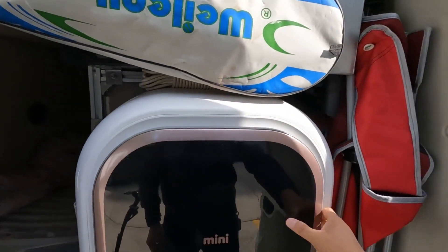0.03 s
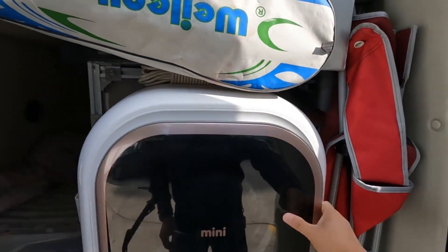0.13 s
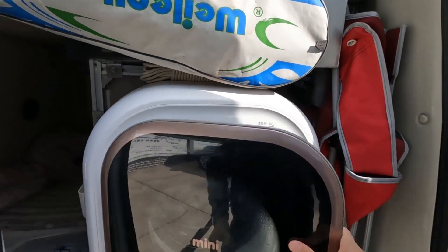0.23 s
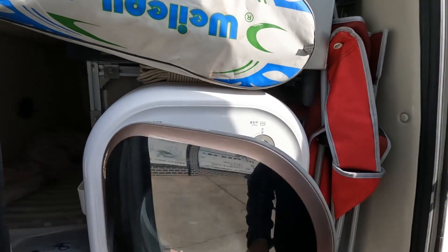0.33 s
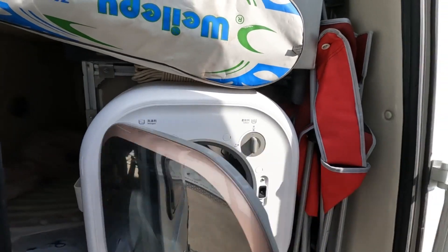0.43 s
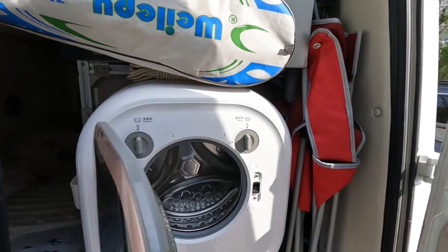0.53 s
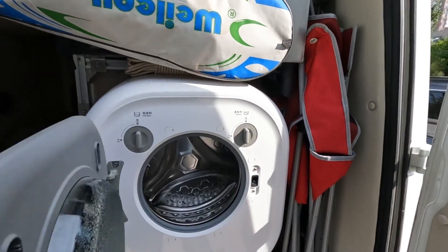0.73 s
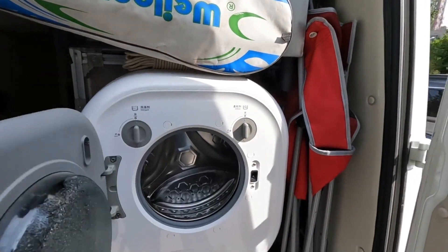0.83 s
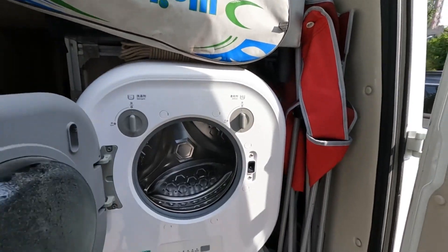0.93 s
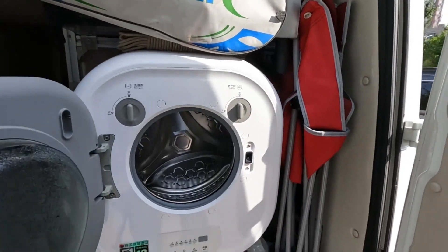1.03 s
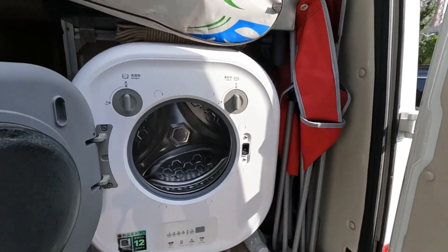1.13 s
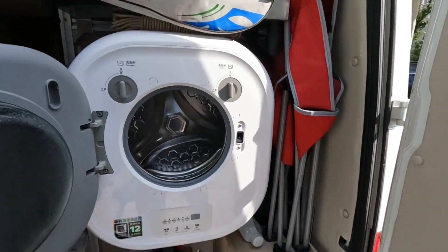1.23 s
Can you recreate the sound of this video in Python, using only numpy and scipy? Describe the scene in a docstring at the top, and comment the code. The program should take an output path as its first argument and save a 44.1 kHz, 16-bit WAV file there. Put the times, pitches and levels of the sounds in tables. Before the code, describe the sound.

A small washing machine door is pulled open, heard close in a cramped space with short dull reflections. After faint ticks, the latch snaps free in clustered clacks from 0.2 to 0.35 seconds, with hollow panel thuds and a brief rising low drum note. A faint rub comes near 0.73, a hinge creak around 0.9, and a soft stop knock at 1.0. Low hum and outdoor rumble continue throughout.

```python
"""Cramped space with outdoor rumble: a small washing machine's plastic door is pulled open at close range.
The latch chatters free in clacks (shaped noise through modes); door and cabinet thud (pushes into panel modes).
The drum's air note, a gliding sine, rises as the gap widens; later the hinge creaks (stick-slip clicks into
resonances) and the door knocks at its stop. A wavering low hum (sines) and rumble (coloured noise) lie under it."""
import sys
import numpy as np
from scipy import signal
from scipy.fft import rfft, irfft
from scipy.io import wavfile
from scipy.ndimage import uniform_filter1d

SR = 44100
rng = np.random.default_rng(int(sys.argv[2]) if len(sys.argv) > 2 else 0)


def store_wav(level_fs):
    """Save 16-bit WAV to argv[1]."""
    pcm = np.round(np.clip(np.atleast_2d(level_fs), -1, 1) * 32767)
    wavfile.write(sys.argv[1], SR, pcm.T.astype(np.int16))


def how_loud(loudness_db):
    """Turn decibels into a plain amplitude multiplier (0 dB gives 1, 20 dB gives 10)."""
    steps = np.asarray(loudness_db, float) / 20
    return 10 ** steps


N = 57330
T = np.arange(N) / SR
LEFT_RIGHT = np.array([[1], [-1]])


def column(table, index):
    """One column of a curve, joined by straight lines in time."""
    a = np.array(table, float)
    return np.interp(T, a[:, 0], a[:, index])


def unit(x):
    """Scale to rms 1."""
    return x / np.sqrt(np.mean(x ** 2))


def low(x, hz):
    """Second-order low-pass."""
    return signal.sosfilt(signal.butter(2, min(hz, 20000), fs=SR, output="sos"), x)


def high(x, hz):
    """Second-order high-pass."""
    return signal.sosfilt(signal.butter(2, hz, "high", fs=SR, output="sos"), x)


def colour(x, points):
    """Causal minimum-phase filter with the given (f/Hz, level/dB) response."""
    a = np.array(points, float)
    grid_hz = np.linspace(1, SR / 2, 2049)
    level_db = np.interp(np.log(grid_hz), np.log(a[:, 0]), a[:, 1])
    cepstrum = irfft(np.log(how_loud(level_db)))
    # fold onto positive time
    cepstrum[1:2048] *= 2
    cepstrum[2049:] = 0
    impulse = irfft(np.exp(rfft(cepstrum)))[:2048]
    return signal.fftconvolve(x, impulse)[:len(x)]


def ring(x, modes):
    """Decaying sine modes (f/Hz, level/dB, t60/s; at least 3 ms) struck by x."""
    t = T[:SR // 2]
    h = 0
    for hz, db, t60_s in modes:
        h = h + how_loud(db) * np.sin(2 * np.pi * hz * t) * 1000. ** (-t / max(t60_s, .003))
    return signal.fftconvolve(x, h)[:len(x)]


def walk(rate_hz):
    """Slow random wander, spread near 1: held random steps, smoothed twice."""
    k = int(SR / rate_hz)
    steps = np.repeat(rng.standard_normal(N // k + 1), k)
    return 1.3 * uniform_filter1d(uniform_filter1d(steps, k), k)[:N]


def pan(x, db):
    """Place by level difference, left over right."""
    return x * how_loud(np.array([db / 2 + 0 * T, -db / 2 + 0 * T]))


def rumble():
    """Outdoor rumble and hiss: coloured noise, nearly alike left and right in the bass, wandering in level."""
    # noise spectrum: f/Hz, relative density/dB
    spectrum = [(12, -20.5), (22, 0.5), (55, -1.5), (80, -8), (130, -10.5), (250, -20.5), (450, -19),
                (630, -25.5), (1500, -31), (2000, -38), (4650, -45), (7500, -54), (9000, -64), (12000, -70),
                (15400, -88)]
    # band level: t/s, middle/dB, bass/dB, treble/dB (relative)
    bands = [(0, 5, 5.5, 2), (.2, -1.5, 0, 0.5), (.4, 2, 6, 1), (.55, 0, 0.5, 0.5), (.66, -3, -1, -3),
             (.8, -4, -2.5, -5.5), (.89, -6, -5, -6.5), (1.0, 4, 4, 7), (1.04, 3.5, 2, 2.5),
             (1.15, 3, -3, 3), (1.3, -0.5, 0, 1)]
    level_db, bass_hz, treble_hz = -39, 500, 1940
    mid, side = (unit(colour(rng.standard_normal(N), spectrum)) for _ in range(2))
    side = 0.27 * high(side, 580) + 0.1 * side
    both = mid + side * LEFT_RIGHT
    bass = low(both, bass_hz)
    treble = both - low(both, treble_hz)
    middle = both - bass - treble
    # bass and middle wander by about 1 dB
    bass = bass * how_loud(column(bands, 2) + walk(7))
    middle = middle * how_loud(column(bands, 1) + walk(15.45))
    treble = treble * how_loud(column(bands, 3))
    return how_loud(level_db) * (bass + middle + treble)


def hum():
    """Low hum: sines that waver independently in pitch and level."""
    # partials: f/Hz, rms level/dB (both centres of the wander)
    partials = [(99, -43), (193, -57.5), (403, -58)]
    level_spread_db, pitch_spread = 2.2, 0.0259  # pitch as a share of f
    out = np.zeros(N)
    for hz, db in partials:
        gain = np.sqrt(2) * how_loud(db + level_spread_db * walk(11.48))
        phase = 2 * np.pi * np.cumsum(hz * (1 + pitch_spread * walk(7))) / SR
        out += gain * np.sin(phase)
    return out


def room(x):
    """Short, dull reflections of the cramped space: decaying noise, different left and right."""
    t60_s, level_db, top_hz, bottom_hz = .15, -15.5, 6000, 650
    t = T[:SR // 3]
    noise = high(low(rng.standard_normal((2, len(t))), top_hz), bottom_hz)
    tail = noise * 1000. ** (-t / t60_s) * (t > .0015)
    tail /= np.sqrt((tail ** 2).sum(axis=1, keepdims=True))
    return how_loud(level_db) * signal.fftconvolve(x, tail, axes=1)[:, :N]


def drum_air():
    """Air note of the drum: a sine whose pitch climbs as the opening grows."""
    # glide: t/s, f/Hz, rms level/dB
    glide = [(.285, 59.4, -17.5), (.3, 72, -13), (.315, 88.3, -14), (.332, 101, -28), (.35, 124.5, -14),
             (.37, 135.4, -35.5), (.4, 132.3, -20.5), (.43, 131, -60)]
    on = (T > glide[0][0]) & (T < glide[-1][0])
    phase = 2 * np.pi * np.cumsum(on * column(glide, 1)) / SR
    return on * np.sqrt(2) * how_loud(column(glide, 2)) * np.sin(phase)


def rub():
    """Hinge and door rub: uneven stick-slip clicks into hinge resonances and door body, partly unlike L/R."""
    # rubbing: t/s, relative level/dB, slip rate/(1/s), pan/dB, treble/dB
    rubbing = [(.70, -95, 770, 8, 0), (.714, -50, 1220, -2, -11), (.728, -43.5, 870, -2, -5.5),
               (.74, -56.5, 1200, 2, -4), (.75, -81, 900, 0, 12), (.893, -70, 990, 15, 6),
               (.9, -56, 1900, -2, 8), (.907, -42, 1250, 3, -2), (.91, -35.5, 1060, 3, 0),
               (.925, -33.5, 980, 1, -3.5), (.945, -41, 840, 3, 7.5), (.96, -45.5, 800, 1.5, 3),
               (.995, -48.5, 780, 3.5, 4), (1.022, -47, 990, 3.5, 1), (1.045, -53, 480, 4, 4),
               (1.1, -59.5, 1600, 4, 6), (1.15, -68, 1200, 1, -10)]
    # hinge resonances: f/Hz, nominal width/Hz (at least 60 used), relative level/dB
    hinge = [(394, 62, -7.5), (735, 65, 1.5), (1000, 110, -4), (1127, 48, 3), (1470, 65, -1),
             (2043, 48, -2.5), (2654, 170, 0), (3360, 190, -18), (3980, 100, -12), (6500, 930, -25)]
    # door body response: f/Hz, relative density/dB
    door = [(180, -17.5), (300, -26), (730, -21), (1300, -5), (1700, -14.5), (2800, -13.5), (4000, -21),
            (5200, -28), (7000, -21.5), (9000, -38.5), (12000, -49), (15400, -79)]
    grind = .5  # amount of continuous rubbing noise under the slips
    door_db, treble_hz, apart_db = -1, 4500, -14.5
    thin_until_s, thin_hz, thin_lows_db = .8, 1800, -18.5  # the first rub has weak lows
    g = rng.standard_normal((3, N))
    rate = column(rubbing, 2) / SR
    slips = (rng.random(N) < rate) * how_loud(2 * g[1]) / np.sqrt(rate) + grind * g[0]
    on = (T > rubbing[0][0]) & (T < rubbing[-1][0])
    modes = [(hz, db, 2.2 / max(width_hz, 60)) for hz, width_hz, db in hinge]
    impulse = (T == 0) * 1.
    hinge_norm = np.linalg.norm(ring(impulse, modes))
    door_norm = np.linalg.norm(colour(impulse, door))

    def body(clicks):
        """Hinge modes plus door body, then the changing treble and the thin start."""
        clicks = clicks * on * how_loud(column(rubbing, 1))
        x = ring(clicks, modes) / hinge_norm + how_loud(door_db) * colour(clicks, door) / door_norm
        x = x + (how_loud(column(rubbing, 4)) - 1) * high(x, treble_hz)
        thin = high(high(x, thin_hz), thin_hz) + how_loud(thin_lows_db) * x
        return np.where(T < thin_until_s, thin, x)

    side = high(body(slips * np.sign(g[2])), 800)
    both = body(slips * np.sign(g[0])) + how_loud(apart_db) * side * LEFT_RIGHT
    return pan(both, column(rubbing, 3))


def thuds():
    """Door and cabinet thuds: soft half-sine pushes ring the panels."""
    # pushes: t/s, relative level/dB, length/s
    pushes = [(.213, -23.5, 0.0038), (.245, -16, 0.0059), (.257, -13, 0.0016), (.281, -11, 0.0027),
              (.314, -20, 0.0016), (.324, -8.5, 0.0029), (.343, -55, 0.0049), (.385, -19, 0.012),
              (.43, -25, 0.0051), (.915, -48.5, 0.0014), (1.004, -13, 0.013), (1.03, -42, 0.0022),
              (1.047, -35, 0.0027)]
    # panel modes: f/Hz, relative level/dB, t60/s
    panels = [(38, -17, .1), (72, -10.5, 0.22), (121.2, -6, 0.24), (149.1, 5.5, 0.151),
              (198.35, -4.5, 0.79), (259.4, 5, 0.12), (452, -2, 0.14)]
    push = np.zeros(N)
    for start_s, db, length_s in pushes:
        u = np.clip((T - start_s) / length_s, 0, 1)
        push += how_loud(db) * np.sin(np.pi * u) / (length_s * SR)
    return pan(high(ring(push, panels), 37), -0.83)


def clacks():
    """Latch clacks: each a dying chatter of tiny contacts, heard as a broad crack plus the latch modes."""
    # latch and small ticks: t/s, relative level/dB, chatter t60/s, top f/Hz, bottom f/Hz, pan/dB
    contacts = [(.128, -50, .02, 12100, 3000, 3), (.146, -36.5, 0.047, 1800, 397, 2.5),
                (.203, -42, 0.06, 8200, 305, 11), (.2125, -24, 0.037, 1500, 304, -7),
                (.2188, -24, 0.024, 8300, 1000, -9), (.2226, -10.5, 0.029, 12500, 200, -0.5),
                (.226, -17, 0.022, 7150, 189, -1.5), (.2425, -15, 0.051, 7000, 298, 0),
                (.2462, -13.5, 0.061, 9700, 280, 1), (.2565, -9.5, 0.028, 3000, 500, -2),
                (.2935, -15, .02, 13100, 1500, -2), (.2995, -13, 0.03, 6000, 740, 4.5),
                (.3132, -14, 0.048, 7700, 295, -3), (0.3181, -12.5, 0.056, 1500, 300, 1),
                (.513, -41, 0.022, 11300, 3460, 2.5), (0.959, -36.5, 0.022, 8950, 790, -3),
                (1.031, -30.5, 0.025, 1500, 201, 2), (1.066, -44.5, 0.022, 9000, 1500, 4)]
    # latch modes: f/Hz, relative level/dB, t60/s
    latch = [(440, -13, 0.12), (700, -8.5, 0.037), (870, 3, 0.014), (1000, -3.5, 0.11), (1076, -1, 0.031),
             (1220, 2.5, 0.018), (1500, -11.5, 0.034), (2180, -14, 0.013), (2650, -1.5, 0.0099),
             (3000, -2, 0.0072)]
    # crack spectrum: f/Hz, relative density/dB
    spectrum = [(200, -34), (400, -5.5), (1180, -9.5), (1710, -8.5), (2870, -11), (4000, -14.5),
                (7500, -16.5), (9000, -29.5), (12500, -33), (13500, -33), (15400, -73)]
    rise_s, strength_spread_db = 0.00083, 2.3
    apart_hz, apart_db = 3000, -10.5  # above this the two microphones hear partly unlike chatter
    out, t = np.zeros((2, N)), T[:SR // 5]
    for start_s, db, t60_s, top_hz, bottom_hz, pan_db in contacts:
        g = rng.standard_normal((3, len(t)))
        shape = how_loud(strength_spread_db * g[1]) * np.minimum(t / rise_s, 1) * 1000. ** (-t / t60_s)
        hits = low(g[0] * shape, top_hz)
        unlike = high(low(g[2] * shape, top_hz), apart_hz)
        crack = colour(hits, spectrum)
        scale = 1 / np.sqrt(np.mean(crack ** 2))
        x = high(unit(ring(hits, latch)) + scale * crack, bottom_hz)
        # level set by the loudest 128 samples
        peak_rms = np.sqrt(uniform_filter1d(x ** 2, 128).max())
        gain = how_loud(db) / peak_rms / 2
        both = x + how_loud(apart_db) * scale * colour(unlike, spectrum) * LEFT_RIGHT
        i = int(start_s * SR)
        out[:, i:i + len(t)] += gain * both * how_loud(pan_db / 2 * LEFT_RIGHT)
    return out


def scene():
    """All sources; only latch and rubbing excite the room."""
    near = clacks() + rub()
    return near + room(near) + thuds() + drum_air() + rumble() + hum()


def low_pass(x):
    """Removes everything above the highest recorded frequency."""
    return signal.sosfilt(signal.butter(12, 15530, fs=SR, output="sos"), x)


def record(dry):
    """Soft overload (tanh) rounds the loudest peaks."""
    drive = 0.66
    mix = np.tanh(drive * dry) / drive
    return low_pass(mix)


dry = scene()
out = record(dry)
store_wav(out)
```